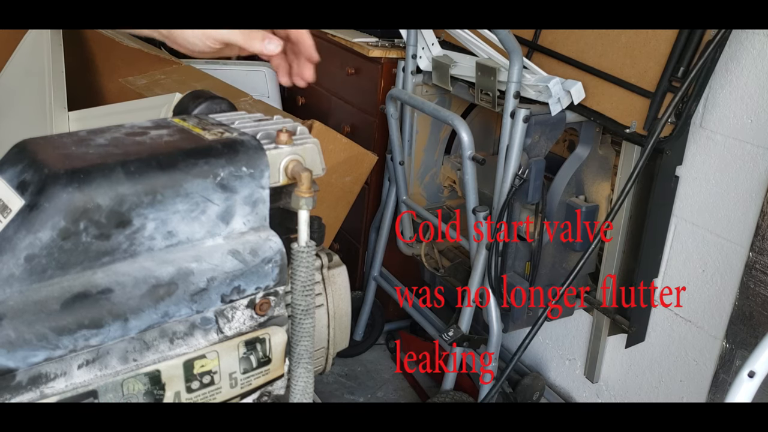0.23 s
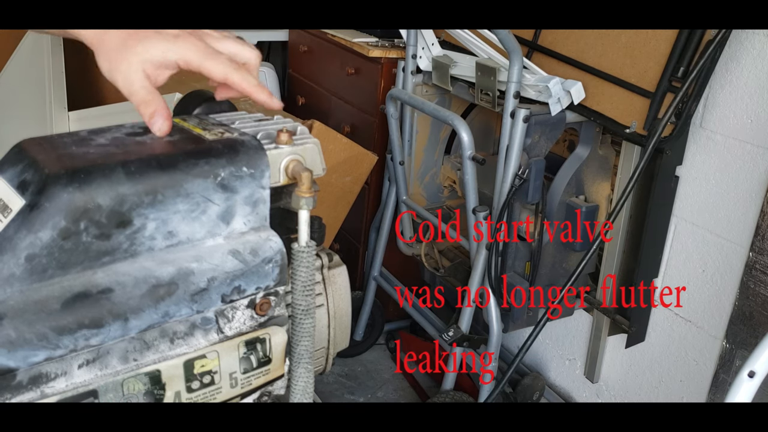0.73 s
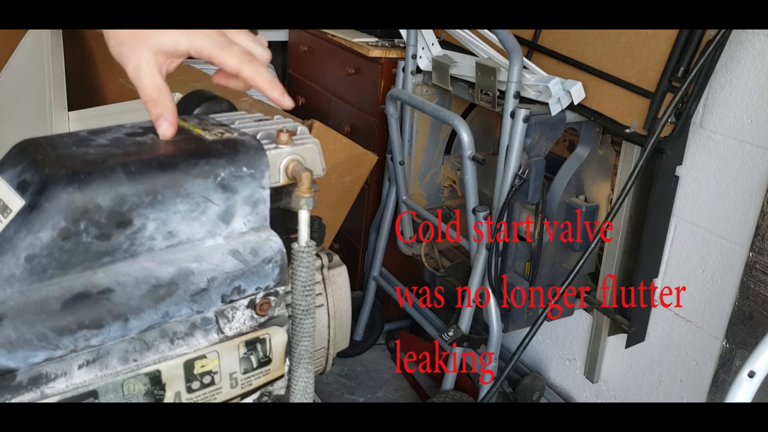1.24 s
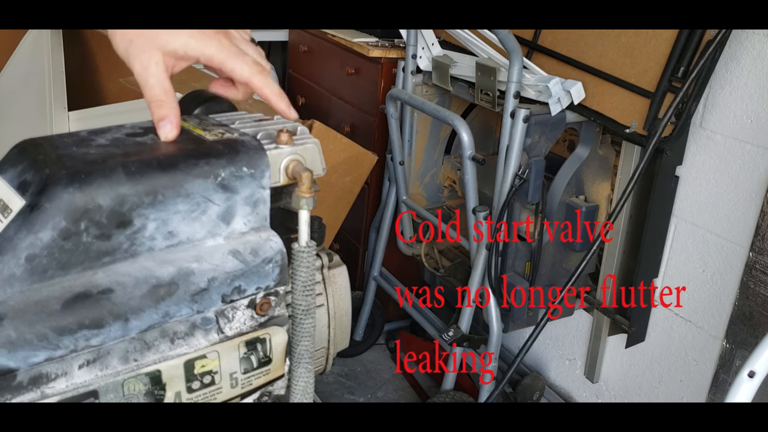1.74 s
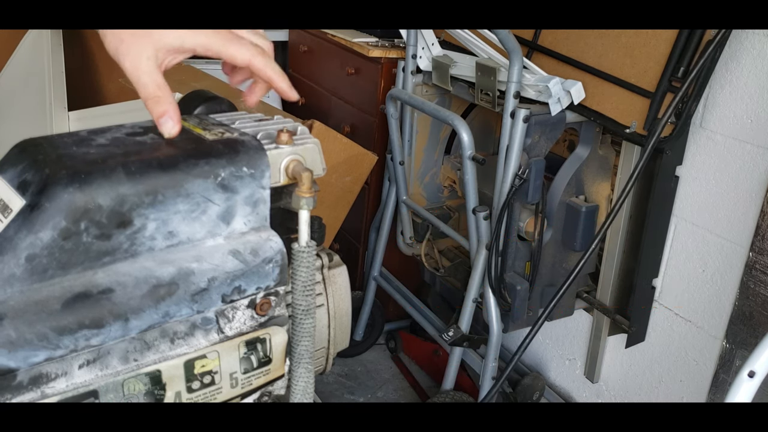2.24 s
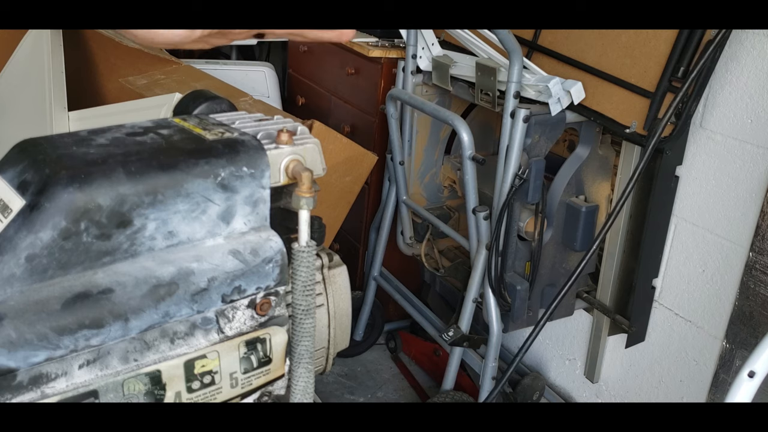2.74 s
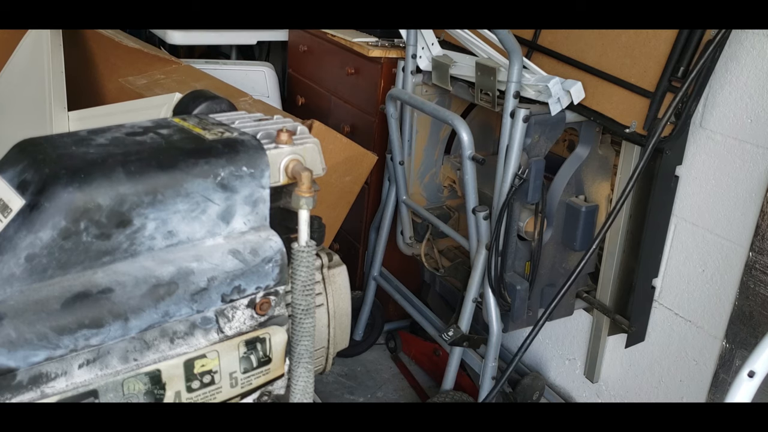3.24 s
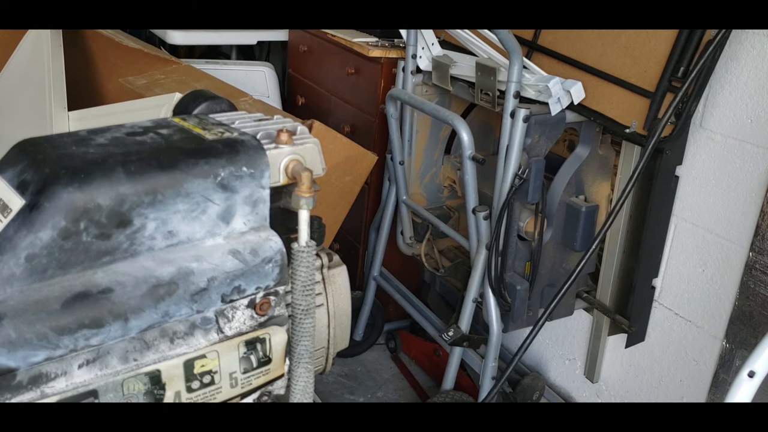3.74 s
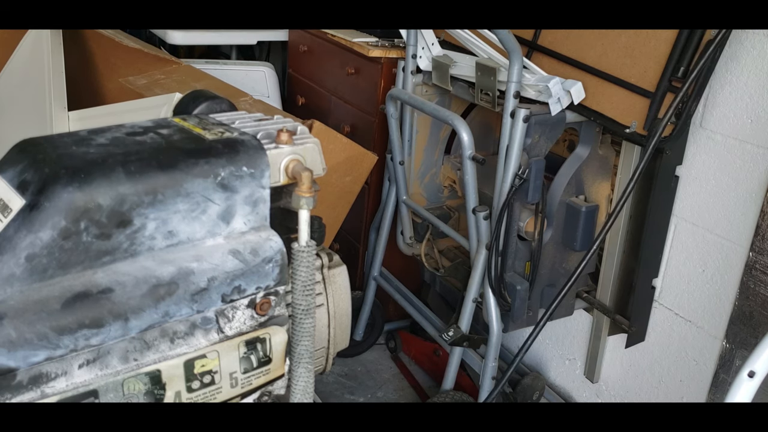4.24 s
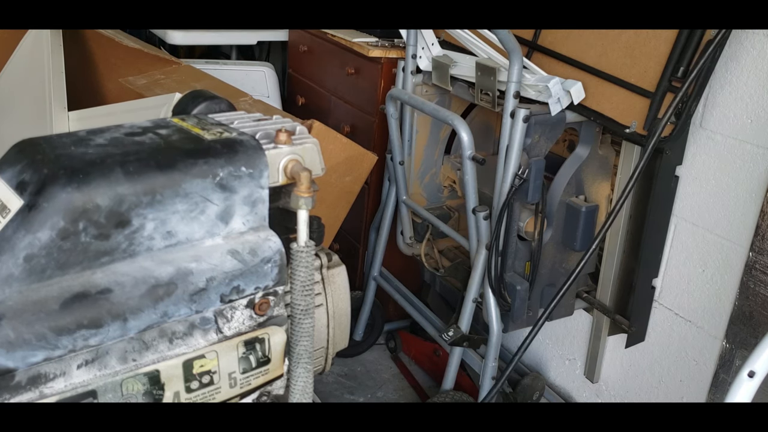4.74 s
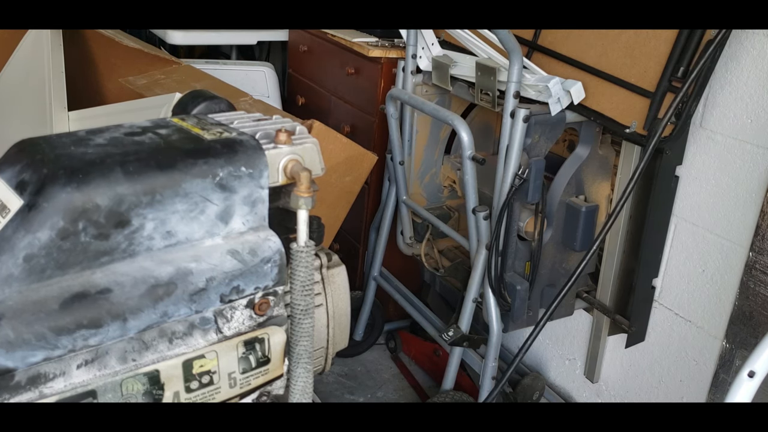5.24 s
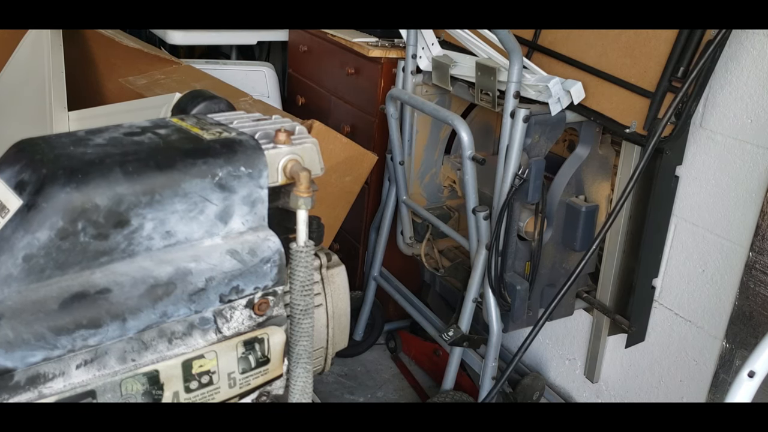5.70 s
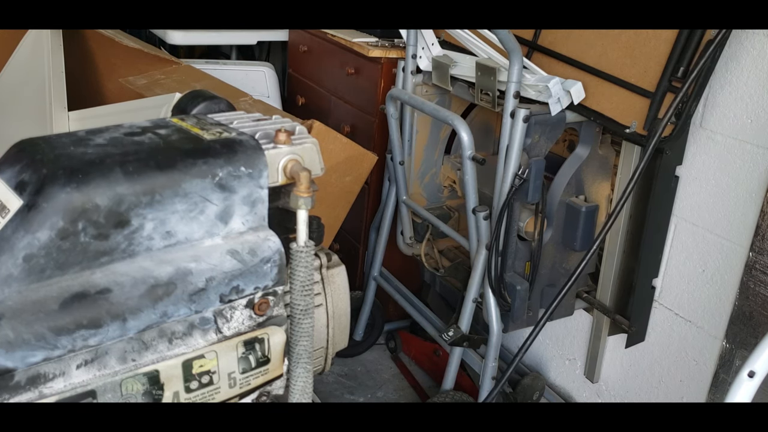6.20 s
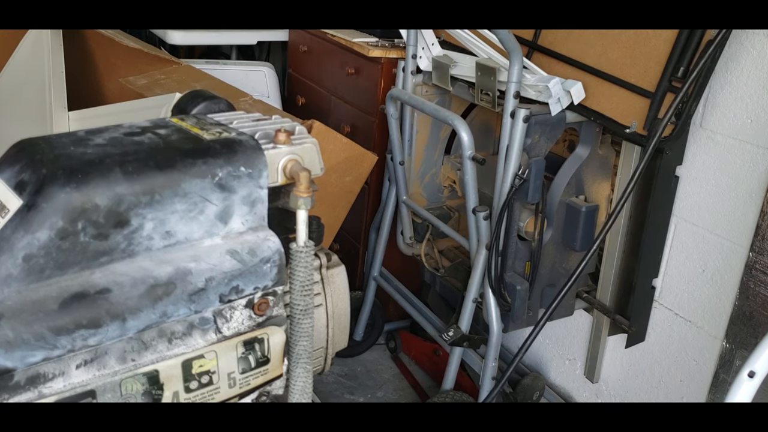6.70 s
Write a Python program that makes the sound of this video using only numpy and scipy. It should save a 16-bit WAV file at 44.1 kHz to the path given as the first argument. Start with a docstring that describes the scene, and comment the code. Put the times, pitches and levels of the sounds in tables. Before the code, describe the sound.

A piston air compressor is already running at the start and keeps going for the whole seven seconds, heard close up in a garage. Its rapid strokes merge into an even, buzzing motor and pump hum, strongest in the low middle range. Over it lie a fast, bright metallic clatter from the casing and a loose part, a thin, very high ringing from the valve, and a steady hiss of cooling air. From about 1 to 2.2 seconds, fingers brush the plastic cover a few times, making faint, short, grainy swishes. The tone of the hum shifts slightly during the first three seconds or so. Its level dips a little from around 1.3 to 3 seconds and recovers by about 4.7 seconds. The speed and pitch stay constant, and the machine is still running at the end.

```python
"""A single-piston air compressor runs steadily in a garage. Every stroke sends a pressure pulse through
intake, tank and shroud, a periodic excitation heard as a hum of many harmonics. Each stroke also slaps
the reed valve and shakes the casing, which ring in their normal modes; a loose part rattles on every
second stroke and the shroud drums with it. The motor hums, cooling air hisses, and fingers brush the
plastic shroud a few times."""
import sys
import numpy as np
from scipy import signal
from scipy.fft import rfft, irfft, next_fast_len
from scipy.io import wavfile
from scipy.ndimage import uniform_filter1d

SR = 44100
rng = np.random.default_rng(int(sys.argv[2]) if len(sys.argv) > 2 else 0)


def wrap_up_sound(samples):
    """Save the sound to the file named by the first command line argument, as 16-bit audio."""
    columns = np.atleast_2d(samples).T
    # keep every value between -1 and 1, then stretch to whole-number steps
    tamed = np.clip(columns, -1, 1)
    steps = np.round(tamed * 32767).astype(np.int16)
    wavfile.write(sys.argv[1], SR, steps)


N = 306936
TIME = np.arange(N) / SR
STROKE_HZ, SAG_HZ_PER_S = 57.3905, .0039  # initial stroke rate, and its fall as pressure builds
TOP_ORDER = 43  # highest harmonic of the stroke rate
LAG_S = .00014  # the right channel lags the left
SWITCH_S = 1.32  # the rattle comes one stroke early here and switches from odd to even strokes

# strong harmonics of the stroke rate, from the fundamental up: (left level/dB, right level/dB)
STRONG_HARMONICS = [(-55.5, -56), (-52, -54), (-51, -55), (-44, -44.5), (-57.5, -57.5), (-46.6, -48),
                    (-53.5, -52), (-37.5, -38), (-45, -49), (-57.5, -50.5), (-58, -52), (-49, -58),
                    (-53.5, -58), (-57.5, -50.5), (-54.5, -57.5), (-54, -68), (-52, -68.5)]
# normal modes of the casing: (f/Hz, bandwidth/Hz, left level/dB, right level/dB)
CASING_MODES = [(2660, 76, -6.5, -4), (2857, 140, -2, -3), (3730, 530, -8, -8), (4113, 175, 0, 4.5),
                (4610, 1400, -6.5, -4.5), (5830, 440, -3, -0.5), (6150, 99, 1, 0), (7010, 550, -1.5, -4.5),
                (8140, 260, -20, -10.5), (8720, 240, -19, -2), (9840, 75, -4, -2.5), (10480, 210, -23, 1.5),
                (11200, 650, -31, -21.5), (12200, 520, -9, -12)]
# normal modes of the valve plate: (f/Hz, bandwidth/Hz, left level/dB, right level/dB)
REED_MODES = [(13980, 380, -4, -3), (14225, 120, -2, -5), (14440, 40, 9, 8), (14580, 90, -5, -6)]
# finger slides on the shroud: (t/s, duration/s, landing level/dB, lifting level/dB)
FINGER_SLIDES = [(.995, .155, -42, -40.5), (1.365, .012, -51, -52), (1.63, 0.12, -43, -39),
                 (1.857, 0.11, -40, -39), (2.07, .13, -42, -41)]


def amp(db):
    """Amplitude ratio of a level in decibels."""
    return 10 ** (np.asarray(db) / 20)


def unit(x):
    """Normalisation to an RMS of one."""
    return x / np.sqrt(np.mean(x ** 2) + 1e-20)


def along(points, hz):
    """Interpolation of (f/Hz, value) points on a logarithmic frequency axis."""
    f, v = np.transpose(points)
    return np.interp(np.log(hz + 1), np.log(f), v)


def wobble(rate):
    """Random modulation: straight lines between Gaussian knots, rate knots a second."""
    knots = rng.standard_normal(int(N * rate / SR) + 4)
    return np.interp(TIME * rate, np.arange(len(knots)), knots)


def filtered(x, response):
    """Linear filtering: the spectrum of x times a complex frequency response."""
    m = next_fast_len(N + SR // 2)
    return irfft(rfft(x, m) * response(np.fft.rfftfreq(m, 1 / SR)), m)[..., :N]


def ringing(modes):
    """Modal superposition: the response of damped resonators of alternating sign, one row a channel."""
    return lambda f: sum((-1) ** k * amp([[left], [right]]) * 1j * f * bw / (f0**2 - f**2 + 1j * f * bw)
                         for k, (f0, bw, left, right) in enumerate(modes))


def strokes():
    """Piston phase in cycles: the integral of the slowly falling stroke rate."""
    return .049 + STROKE_HZ * TIME - SAG_HZ_PER_S * TIME ** 2 / 2


def impacts(starts, pattern, jitter_s, scatter_db, t60_s, noise_share, creep_rad, direct):
    """Convolution: a pattern of blows after each start is smeared by reflections from nearby surfaces."""
    cycles, hits = strokes(), np.zeros((2, N + SR))
    for part, *db in pattern:
        chance = rng.standard_normal((len(starts), 2))
        onset = np.interp(starts + part, cycles, TIME, right=N / SR) + jitter_s * chance[:, 0]
        for side in (0, 1):  # a windowed sinc places each blow between samples
            place = (np.abs(onset)[:, None] + side * LAG_S) * SR + 8
            taps = place.astype(int) + np.arange(-7, 9)
            impulse = np.sinc(taps - place) * np.cos(np.pi * (taps - place) / 16) ** 2
            hits[side, taps] += amp(db[side] + scatter_db * chance[:, 1:]) * impulse
    decay = amp(-60 * np.arange(round(t60_s * SR)) / SR / t60_s)[None]
    spectra = rfft(decay * rng.standard_normal((2, 2, decay.size)))
    echoes = irfft(spectra / np.sqrt(np.abs(spectra)))  # many small reflections favour no single pitch
    echoes *= np.linalg.norm(decay) / np.linalg.norm(echoes, axis=2, keepdims=True)
    tails = [signal.fftconvolve(hits, echo, axes=1)[:, :N] for echo in echoes]
    drift = creep_rad * wobble(1.2)  # the echoes change as the machine creeps on its feet
    coherent = np.cos(drift) * tails[0] + np.sin(drift) * tails[1]
    coherent += direct * np.linalg.norm(decay) * hits[:, :N]
    envelope = np.sqrt(np.abs(signal.fftconvolve(hits ** 2, decay ** 2, axes=1)[:, :N]))
    incoherent = envelope * rng.standard_normal((2, N))
    return np.sqrt(1 - noise_share) * coherent + np.sqrt(noise_share) * incoherent


def partials(order, amplitudes, cycles, phase):
    """Superposition of unsteady tones at order times the stroke rate; their tone colour slowly shifts."""
    # depth of the colour shift, strongest in the first three seconds, gone by 4.7 s: (t/s, depth 0-1)
    shift_depth = [(0, .5), (.62, 0.4), (.9, 0.6), (1.5, 0.8), (3.1, 0.8), (3.6, .2), (4.7, .01)]
    # colour shift at full depth: (f/Hz, gain/dB)
    shift_spectrum = [(60, 1.2), (230, -.2), (290, 4.5), (345, 0.8), (400, -4.5), (490, 3), (600, -6),
                      (690, 0), (780, 2.5), (980, -0.5), (1500, 2.5), (2400, -0.5), (2670, -16), (2770, 3)]
    depth = np.interp(TIME, *np.transpose(shift_depth))
    shift_gains = amp(along(shift_spectrum, order * STROKE_HZ))
    # walls scatter the left-right phase of the high orders
    scatter_rad = .85 * (order > len(STRONG_HARMONICS) + 2) * rng.standard_normal(len(order))
    leads = 2 * np.pi * order * STROKE_HZ * LAG_S + scatter_rad
    touching = (TIME > FINGER_SLIDES[0][0]) & (TIME < sum(FINGER_SLIDES[-1][:2]))
    tones = np.zeros((2, N))
    for k, pair, offset, lead, shift_gain in zip(order, amplitudes.T, phase, leads, shift_gains):
        unsteadiness = .05 + .006 * k
        angle = 2 * np.pi * k * cycles + offset + unsteadiness * wobble(5)
        angle += .042 * touching * k * wobble(14)
        swing = np.sqrt(2) * (1 + depth * (shift_gain - 1)) * (1 + .6 * unsteadiness * wobble(3))
        tones += swing * pair[:, None] * np.cos(angle + np.array([[.5], [-.5]]) * lead)
    return tones


def motor_hum():
    """Magnetic forces in the motor give two steady pitches that drift in level."""
    # magnetic tones: (f/Hz, level/dB)
    tones = [(120, -72), (360.05, -65)]
    return sum(np.sqrt(2) * amp(db + 2 * wobble(1)) * np.sin(2 * np.pi * hz * TIME) for hz, db in tones)


def cooling_air():
    """Broadband fan and intake noise swells with each stroke and excites casing and valve resonances."""
    # spectral density of the air noise, left and right: (f/Hz, level/dB)
    left_spectrum = [(25, -21), (60, -6.5), (200, -8.5), (380, -2), (480, 4.5), (620, -8.5), (900, -17),
                     (1300, -8.5), (2500, -7), (6500, -7.5), (9000, -9), (11500, -7), (13500, -15.5),
                     (15700, -7)]
    right_spectrum = [(25, -16), (60, -12), (200, -6), (380, -2.5), (480, -1), (620, -4), (900, -3.5),
                      (1300, -12), (2500, -5.5), (6500, -9.5), (9000, -9.5), (11500, -10.5), (13500, -7),
                      (15700, -10)]
    # likeness of the two channels: (f/Hz, coherence from 0 to 1)
    coherence = [(60, 0.62), (500, 0.54), (1000, .4), (2000, 0.24), (15000, 0.15)]

    def mid_side(hz):
        angle = np.arccos(np.clip(along(coherence, hz), -1, 1)) / 2
        return np.array([np.cos(angle), np.sin(angle)])

    def colour(hz):
        resonance = 1 + 1.43 * np.abs(ringing(CASING_MODES)(hz)) + 1.25 * np.abs(ringing(REED_MODES)(hz))
        delay = np.exp(1j * np.pi * hz * LAG_S * np.array([[1], [-1]]))
        return amp([along(left_spectrum, hz), along(right_spectrum, hz)]) * resonance * delay

    spectrogram = signal.stft(rng.standard_normal((2, N + 512)), nperseg=512)[2]
    patches = uniform_filter1d(uniform_filter1d(rng.standard_normal(spectrogram.shape[1:]), 5, 0), 10, 1)
    patchy_noise = signal.istft(spectrogram * amp(1.3 * unit(patches)), nperseg=512)[1][:, :N]
    mid, side = filtered(patchy_noise, mid_side)
    swell = amp(1.2 * np.cos(2 * np.pi * (strokes() - .1)))
    return amp(-38.5) * unit(filtered(swell * np.array([mid + side, mid - side]), colour))


def fingers():
    """Friction of dry skin on rough plastic: a bright, grainy hiss, loudest on landing and lifting."""
    # spectral density of the friction noise: (f/Hz, level/dB)
    skin_spectrum = [(5000, -30), (8000, -10), (10500, -1), (12500, -1), (15900, 2), (16500, -60)]
    rise_s, fade_s, grip_s = .012, .025, .056
    envelope = 0
    for start, length, land_db, lift_db in FINGER_SLIDES:
        t = TIME - start
        landing = amp(land_db) * np.exp(-(t / grip_s) ** 2)
        lifting = amp(lift_db) * np.exp(-((t - length) / grip_s) ** 2)
        sliding = amp((land_db + lift_db) / 2 - 10)
        gate = np.clip(1 + t / rise_s, 0, 1) * np.clip(1 + (length - t) / fade_s, 0, 1)
        envelope += gate * np.maximum(landing + lifting, sliding)
    grain = amp(2.5 * wobble(400)) * (rng.standard_normal((2, N)) + rng.standard_normal(N))
    return envelope * unit(filtered(grain, lambda hz: amp(along(skin_spectrum, hz))))


def shroud_drumming():
    """Forced vibration: the shroud drums with the loose part, halfway between the stroke harmonics."""
    # resonance bands of the shroud: (f/Hz, bandwidth/Hz, left level/dB, right level/dB)
    bands = [(258, 40, -69, -76), (503, 140, -78, -80), (653, 110, -60.5, -64), (997, 70, -58.5, -61),
             (1947, 86, -67, -64.5), (2434, 130, -62.5, -69), (2668, 40, -54, -62), (2806, 280, -59.5, -62)]
    order = np.r_[4:20, 32:TOP_ORDER + 10] + .5
    power = sum(amp([[left], [right]]) ** 2 / (1 + (2 * (order * STROKE_HZ - f0) / bw) ** 4)
                for f0, bw, left, right in bands)
    phase = rng.uniform(0, 2 * np.pi, len(order))
    return partials(order, np.sqrt(power), strokes() + (TIME > SWITCH_S), phase)


def loose_part(every_stroke):
    """Period doubling: the loose part rattles on every second stroke, first the odd, then the even."""
    # blows of one rattle: (delay/strokes, left level/dB, right level/dB)
    bounces = [(.86, 0, 0), (.93, -8, -4), (1.04, -7, -4), (1.14, -6, -7), (1.24, -7, -7), (1.4, -10, -9)]
    switched = every_stroke > np.interp(SWITCH_S, TIME, strokes())
    starts = every_stroke[(every_stroke + switched) % 2 == 1]
    return impacts(starts, bounces, jitter_s=8e-6, scatter_db=2.5, t60_s=.015,
                   noise_share=.11, creep_rad=.74, direct=.22)


def casing(every_stroke, rattle):
    """Impact excitation: knocks and rattle ring the casing modes; the rattle also clicks through air."""
    # knocks within one stroke: (delay/strokes, left level/dB, right level/dB)
    blows = [(0.101, 12.5, 13), (.26, 12, -16), (.42, -12, -8), (0.598, 18, -17)]
    knocks = impacts(every_stroke, blows, jitter_s=8e-6, scatter_db=1.5, t60_s=.045,
                     noise_share=.097, creep_rad=1, direct=.5)
    modes = ringing(CASING_MODES)
    click = filtered(rattle, lambda hz: amp(-1) * 1j * hz / (9000 + 1j * hz))
    return amp(-44) * (unit(filtered(knocks, modes)) + unit(filtered(rattle, modes) + click))


def reed_valve(every_stroke, rattle):
    """Plate resonance: the valve pings near 14 kHz, slapped every stroke and shaken by the rattle."""
    # slaps within one stroke: (delay/strokes, left level/dB, right level/dB)
    blows = [(0, 0, -5), (.1, -10, -14), (.2, -12, -12), (.4, -15, -8), (.56, -15, -11)]
    slaps = impacts(every_stroke, blows, jitter_s=4e-6, scatter_db=-3, t60_s=.008,
                    noise_share=.21, creep_rad=.33, direct=.75)
    return amp(-45.5) * unit(filtered(unit(slaps) + .25 * unit(rattle), ringing(REED_MODES)))


def piston_hum():
    """Fourier series of one pressure pulse a stroke; the low orders keep the phases of a sudden pulse."""
    # spectral envelope of the weak upper harmonics: (f/Hz, left level/dB, right level/dB)
    weak_envelope = [(1080, -74, -61), (1260, -61, -73.5), (1655, -72.5, -78.5), (1675, -67, -71),
                     (1845, -57, -86), (1954, -54.5, -76), (2010, -68, -70), (2540, -69, -79)]
    order = np.arange(1, TOP_ORDER + 1)
    weak, contour = order > len(STRONG_HARMONICS), np.array(weak_envelope)
    db = np.array([along(contour[:, [0, side]], order * STROKE_HZ) for side in (1, 2)])
    db += order % 2 - .5  # odd weak harmonics stand 1 dB above even ones
    db[:, ~weak] = np.transpose(STRONG_HARMONICS)
    # the causal half of the cepstrum gives minimum phase: a pulse that starts at once and rings out
    pulse_db = np.r_[db[0, 0] - 20, db.mean(0), np.full(21, db[1, -1] - 10)]
    cepstrum = irfft(np.log(amp(pulse_db)))
    cepstrum[len(cepstrum) // 2:] = 0
    phase = 2 * rfft(cepstrum).imag[1:TOP_ORDER + 1] - .7
    phase += 3 * (order > 9) * rng.standard_normal(TOP_ORDER)  # the walls scramble the higher orders
    db += weak * rng.standard_normal(db.shape)
    return partials(order, amp(db), strokes() + .02, phase)


def scene():
    """Superposition of the sources; clatter and hiss follow the level of the hum by 0.71 dB per dB."""
    # slow changes in the level of the hum: (t/s, level/dB)
    hum_level = [(0, 1), (.62, 0.5), (.82, 0), (.98, 0.9), (1.3, -1), (2.4, -1.66), (3.1, -1.5),
                 (3.65, -0.3), (4.3, -0.55), (4.7, 1), (5.7, 1.5), (6.1, 1), (6.96, 1.5)]
    db = np.interp(TIME, *np.transpose(hum_level))
    waver = amp(.18 * wobble(10))
    hum = piston_hum() + shroud_drumming() + motor_hum()
    every_stroke = np.arange(int(strokes()[-1]) + 1)
    rattle = loose_part(every_stroke)
    clatter = reed_valve(every_stroke, rattle) + casing(every_stroke, rattle)
    machine = amp(db) * hum + amp(.71 * db) * (clatter + cooling_air())
    return waver * machine + fingers()


def record(dry):
    """Band limiting: a steep low-pass edge near 15.8 kHz."""
    return filtered(dry, lambda hz: np.clip((15870 - hz) / 150, 0, 1) ** 2)


dry = scene()
out = record(dry)
wrap_up_sound(out)
```